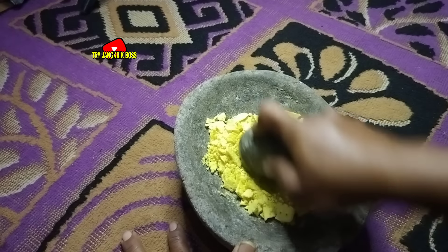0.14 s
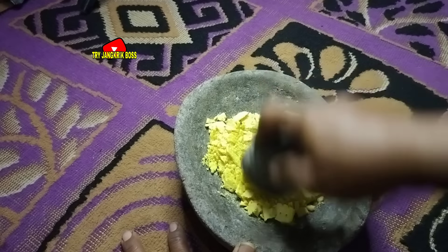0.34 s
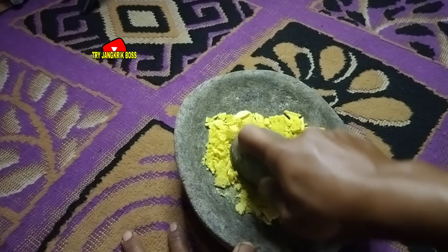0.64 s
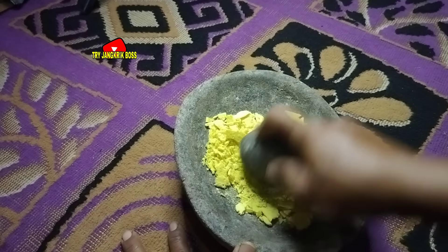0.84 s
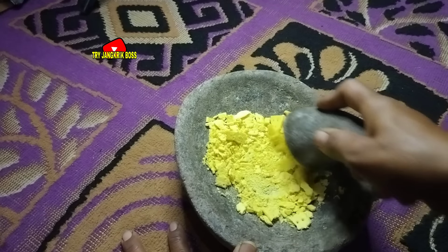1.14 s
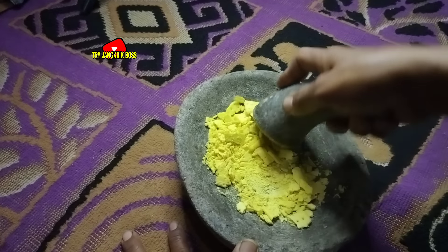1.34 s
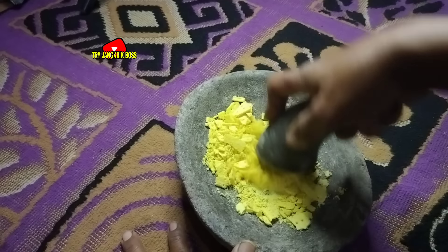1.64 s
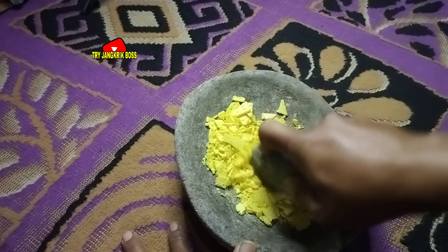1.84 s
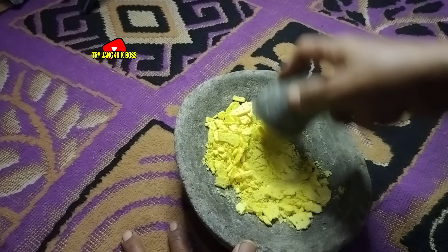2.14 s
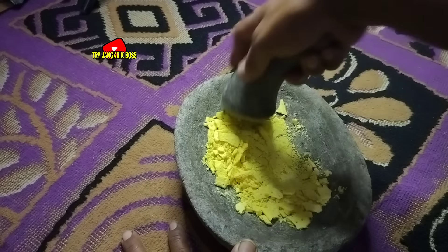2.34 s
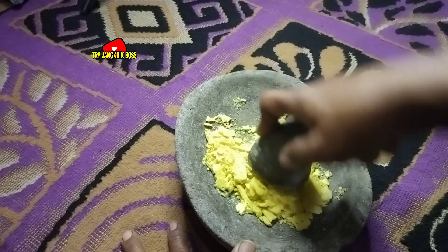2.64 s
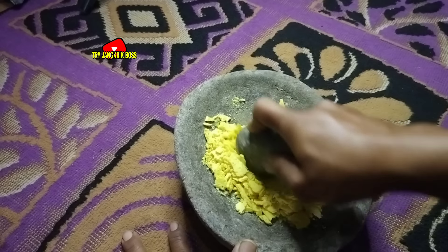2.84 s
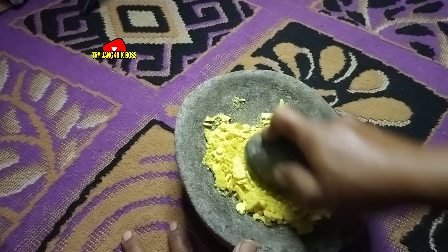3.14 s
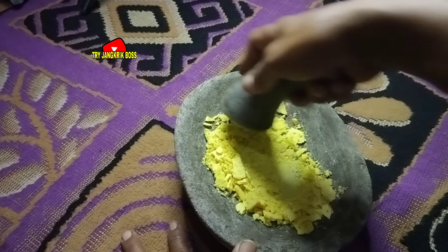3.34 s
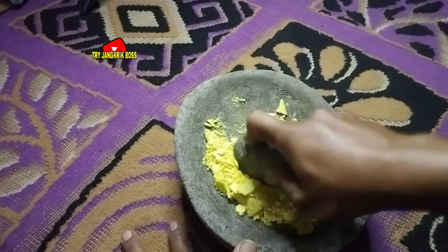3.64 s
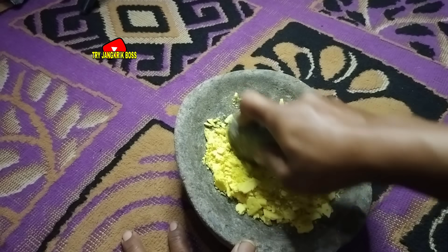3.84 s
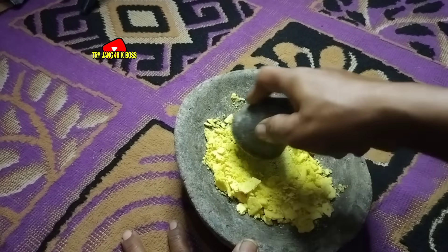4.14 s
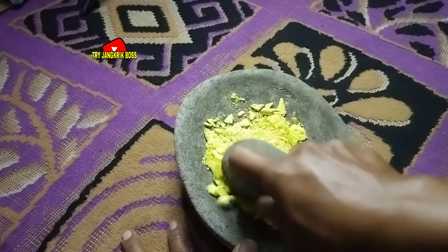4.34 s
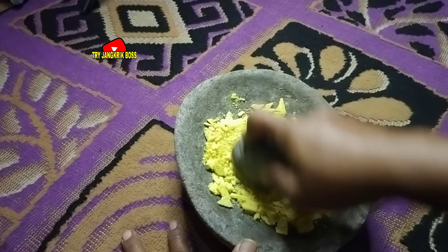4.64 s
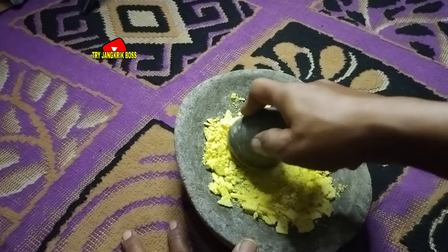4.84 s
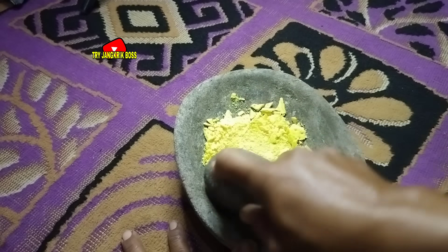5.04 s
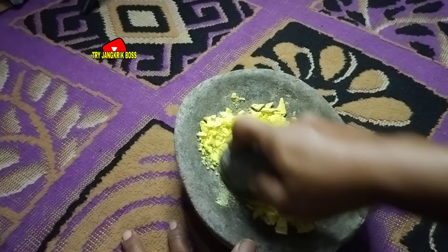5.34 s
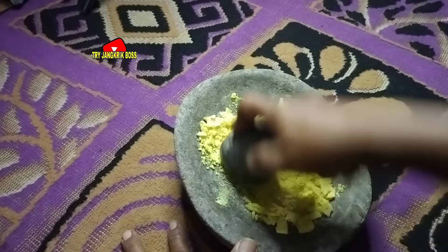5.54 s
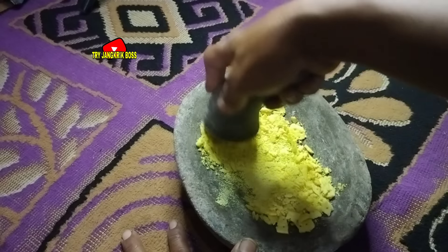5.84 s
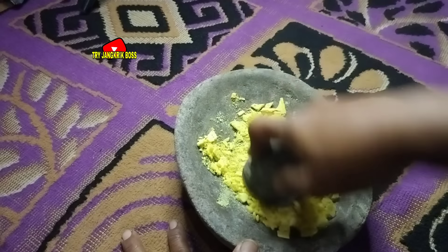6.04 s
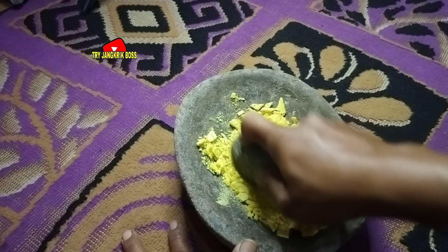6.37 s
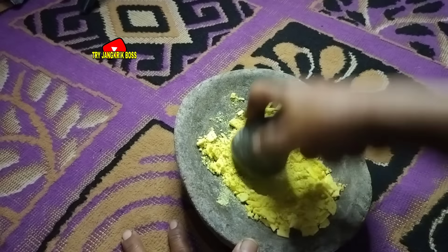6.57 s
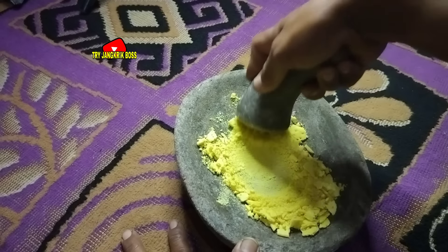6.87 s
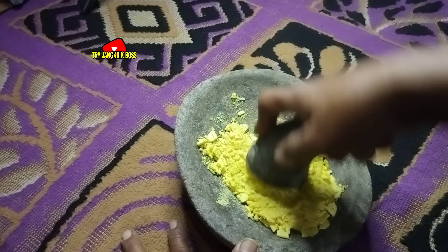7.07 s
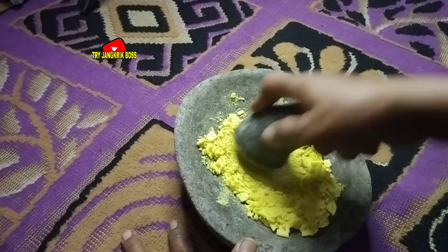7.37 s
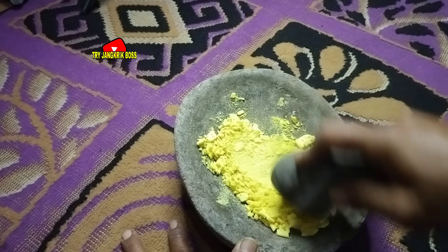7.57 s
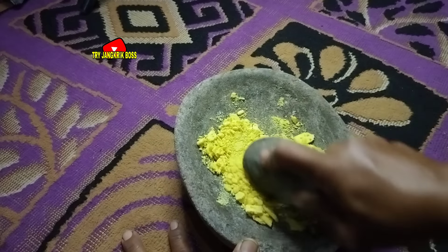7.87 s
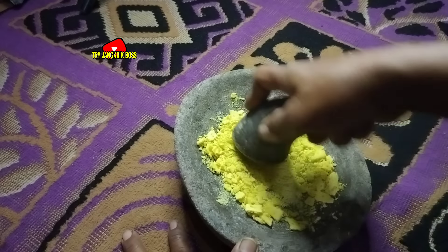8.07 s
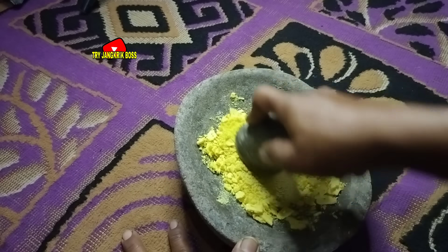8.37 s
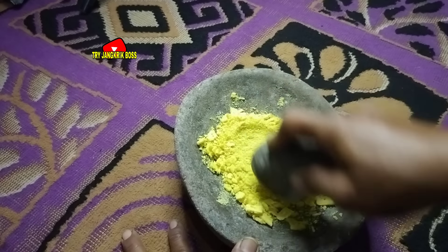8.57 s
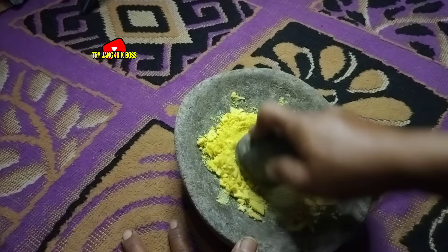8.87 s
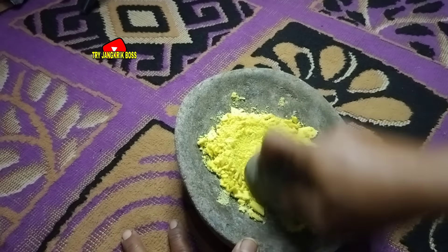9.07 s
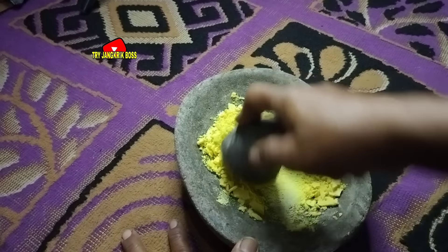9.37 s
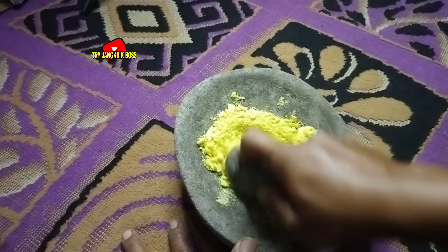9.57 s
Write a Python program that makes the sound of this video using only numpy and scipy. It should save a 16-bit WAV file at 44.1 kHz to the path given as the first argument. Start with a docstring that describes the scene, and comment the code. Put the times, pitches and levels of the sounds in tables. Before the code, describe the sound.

A stone pestle grinds dry crumbs in a stone mortar indoors, with gritty scraping strokes, small snaps, faint squeaks and a few ringing knocks.

```python
"""In a small room, on a carpet, a stone pestle grinds dry crumbs in a shallow stone mortar.
Each push crushes grains and rubs stone on stone, which keeps the pestle ringing faintly; bigger crumbs
snap and bare stone squeaks. The pestle lands softly on the crumbs, knocks hard on bare stone three
times and judders once. Low rumble and thin hiss lie underneath; puffs of air buffet the right microphone."""
import sys
import numpy as np
from scipy import signal
from scipy.fft import rfft, irfft, next_fast_len
from scipy.io import wavfile
from scipy.ndimage import uniform_filter1d

SR = 44100
rng = np.random.default_rng(int(sys.argv[2]) if len(sys.argv) > 2 else 0)


def generate_wav(sig):
    """Save sig (samples, or channels by samples) to the path in sys.argv[1] as 16-bit PCM at SR."""
    pcm = np.round(np.clip(np.atleast_2d(sig).T, -1, 1) * 32767).astype(np.int16)
    wavfile.write(sys.argv[1], SR, pcm)


N = 428211
TIME = np.arange(N) / SR
BIN_HZ = np.fft.rfftfreq(next_fast_len(N), 1 / SR)

# Levels are relative within a layer; a colour is a spectral density.
# colours of the room's low rumble and its peaky hiss: f/Hz, level/dB
RUMBLE_COLOUR = [(20, -2), (45, -5), (90, 6.5), (130, -0.5), (200, -5), (320, -17.5), (520, -20),
                 (1200, -73)]
HISS_COLOUR = [(700, 4), (3000, -4.5), (4200, -8.5), (5200, 5), (5950, -9), (7000, 13.5), (8600, -15.5),
               (10300, 11.5), (11200, 0.5), (12000, -27.5)]
# the background ducks, at the start and at the hard knocks: t/s, depth of the hiss dip/dB
BACKGROUND_DIPS = [(0, 6.5), (1.126, 9.5), (3.489, 9), (9.57, 9)]
# pushes of the pestle: t of peak/s, swell/s, fade/s, rub level/dB, crush level/dB, powder treble/dB; the last
# row stands for the stone ringing on after the final knock
PUSHES = [(0.069, 0.039, 0.03, -42.5, -30.5, -6.5), (0.229, 0.12, 0.063, -42.5, -39, -3),
          (0.561, 0.072, 0.039, -43, -29, 4), (0.631, 0.096, 0.048, -41.0, -32, -3),
          (0.761, 0.029, 0.031, -43, -36.5, -1), (0.828, 0.022, 0.17, -50.5, -43, -2.0),
          (1.287, 0.11, 0.097, -47.5, -37.0, 1.5), (1.384, 0.015, 0.0097, -54, -39.5, -4),
          (1.501, 0.052, 0.092, -67, -35, -3), (1.687, 0.086, 0.028, -43.5, -29, 1),
          (1.749, 0.057, 0.031, -56, -32.5, 2.5), (1.913, 0.19, 0.032, -61, -33, 2),
          (1.934, 0.054, 0.046, -40, -32, 1), (2.077, 0.022, 0.082, -55, -42.5, 0.5),
          (2.49, 0.03, 0.029, -42, -27.5, -2.5), (2.611, 0.11, 0.021, -62, -39.5, 11),
          (2.663, 0.13, 0.044, -42.0, -23, -3.5), (2.741, 0.023, 0.083, -49, -38, 1.5),
          (2.869, 0.098, 0.068, -38.5, -27, -6.5), (3.081, 0.051, 0.033, -38.5, -27.5, -2.0),
          (3.179, 0.046, 0.096, -40, -40, -3.5), (3.63, 0.071, 0.071, -48, -35.0, -2.5),
          (3.782, 0.064, 0.047, -41, -35, -1), (3.939, 0.038, 0.061, -47.5, -39, 0.5),
          (4.038, 0.023, 0.15, -44.5, -49, -8), (4.387, 0.024, 0.12, -40.5, -28.5, -1),
          (4.542, 0.088, 0.022, -42.5, -32.5, -7), (4.702, 0.049, 0.033, -45, -30.5, -10.0),
          (4.799, 0.033, 0.076, -41.5, -33, -4), (5.243, 0.079, 0.064, -38.5, -32, 5.5),
          (5.425, 0.039, 0.036, -37.5, -26, 1), (5.562, 0.092, 0.087, -41.5, -37.5, -2),
          (6.01, 0.075, 0.073, -38, -28.5, -1), (6.07, 0.026, 0.12, -40.5, -25.5, -4.0),
          (6.241, 0.045, 0.055, -38.5, -26, -2), (6.279, 0.049, 0.066, -34.5, -30.5, -2.5),
          (6.485, 0.042, 0.035, -39.0, -36, 0.0), (6.591, 0.039, 0.066, -40, -44, -0.5),
          (7.037, 0.062, 0.026, -38, -28.5, -1), (7.115, 0.081, 0.073, -39.5, -28, -4.5),
          (7.258, 0.035, 0.073, -31.5, -23, -6), (7.874, 0.086, 0.065, -38.5, -27, 7.5),
          (8.052, 0.18, 0.048, -35.5, -25, -4), (8.258, 0.048, 0.048, -35.5, -23, -0.5),
          (8.397, 0.049, 0.064, -31.5, -26, -2), (8.842, 0.04, 0.105, -35, -33.0, 10.5),
          (8.946, 0.14, 0.053, -35, -25.5, -5), (9.142, 0.05, 0.043, -39, -27, 2.5),
          (9.3, 0.063, 0.054, -35, -27.5, -1.5), (9.657, 0.097, 0.21, -38, -45, 3)]
# colours of stone rubbing stone and of breaking crumbs: f/Hz, level/dB
RUB_COLOUR = [(300, -32), (480, -1), (750, -10), (1000, 0), (1250, 5), (1550, 3), (1850, -14),
              (2400, -10.5), (3200, -35), (5000, -2.5), (9000, -17.5)]
CRUSH_COLOUR = [(700, -22.5), (1500, -9.5), (2500, 1.5), (3200, -2.5), (4400, 3.5), (5900, -2), (6900, 2.5),
                (8200, -5), (10500, -3.5), (12500, -12), (15500, -13.5)]
# fractures are sparse in big flakes, dense in powder: t/s, rate/Hz
FRACTURE_RATE = [(.9, 30000), (1.3, 4100), (1.6, 3600), (1.95, 22000), (8, 26600)]
# the treble shelf that fine powder lifts: f/Hz, gain
POWDER_SHELF = [(4500, 0.14), (9000, 0.98)]
# stereo image of the grinding: f/Hz, left-right correlation
STEREO_LIKENESS = [(450, 0.89), (1200, 0.66), (4000, 0.33), (11000, 0.0)]
# ringing modes of the stone: f/Hz, level/dB, t60/s, left-ear lead/rad (limited to +-1 in use)
STONE_MODES = [(2130, -8.5, 0.35, -6), (2127, -12.5, 0.16, -3.5), (2225, 2, 0.11, 3),
               (2224, -16, 0.41, 4.4), (4630, -21, 0.105, -3.5), (6800, -14.5, 0.071, 0)]
# puffs of air: t of peak/s, level/dB, fade/s
AIR_PUFFS = [(.1, -22, 0.055), (0.149, -8, 0.045), (0.547, -6.5, 0.037), (.63, -21, 0.11),
             (0.831, -5, 0.052), (.91, -12, 0.069), (1.0, -13.5, 0.041), (1.112, -12.5, 0.052),
             (1.19, -23, .07), (3.55, -25, 0.049), (4.052, -14.5, 0.053), (4.1, -15, .03),
             (4.17, -24.5, 0.066), (4.408, -14.5, 0.044), (4.48, -10.5, 0.038), (8.77, -18.5, 0.066),
             (8.969, -13.5, 0.011)]
# their bassy colour: f/Hz, level/dB
PUFF_COLOUR = [(18, -4.5), (70, 2), (130, 0), (190, -9.5), (400, -34.5), (700, -67)]
# a stroke ends on bare stone and squeaks: t/s, level/dB
STONE_SQUEAKS = [(.17, -46), (.8, -43), (1.95, -40), (3.2, -43), (3.76, -42), (4.04, -50), (4.812, -37),
                 (6.278, -30.5), (6.49, -45), (6.6, -39), (7.308, -29), (8.41, -31.5), (8.95, -32.5),
                 (9.32, -30.5)]
# crumbs bursting under the pestle: t/s, level/dB, crumbling time/s
CRUMB_SNAPS = [(0.4538, -17.5, 0.016), (1.222, -19.5, 0.0028), (1.383, -21, 0.0014), (1.419, -23, 0.0016),
               (1.46, -18.5, .001), (1.4673, -11.5, 0.00068), (1.7695, -12, 0.0022), (1.8157, -18, 0.0021),
               (2.072, -31, 0.0023), (2.4116, -20.5, 0.0064), (4.366, -22, 0.0062), (5.1127, -23.5, 0.0076),
               (5.385, -27, .01), (5.884, -18, 0.0078), (6.8647, -23, 0.015), (7.676, -23.5, 0.018),
               (7.789, -20, 0.0028), (8.196, -27.5, 0.011), (8.75, -16, 0.0053), (9.082, -24.5, 0.012),
               (9.563, -20, 0.008)]
# pestle meets mortar: t/s, ring level/dB, clack level/dB, ring length factor, lowest pair's boost/dB
PESTLE_KNOCKS = [(.457, -39, -36, 2, -7), (1.1222, -5.5, -5, 1.35, -4), (1.228, -32.5, -15, 0.8, 15.5),
                 (2.411, -28.5, -20.5, 0.9, -13), (3.4887, -11, 2.5, 0.59, -3.5),
                 (3.9244, -38.5, -58, 2.0, -7), (5.1124, -42.5, -38, 2.5, 9), (5.8854, -34, -26, 1.3, 11),
                 (6.9922, -44, -16.5, 0.5, -9), (7.6789, -25.5, -53, 1.5, -11),
                 (7.6877, -18.5, -59, 1, -26), (8.752, -22.5, -49, 0.94, -15),
                 (9.5682, -14.5, -1.5, 0.49, 14.5), (9.629, -25.5, -60, 1, 17.5)]
# short, hand-damped modes of a contact: f/Hz, level/dB, t60/s
CLACK_MODES = [(1227, -2, 0.016), (1520, 1, 0.0097)]
# envelope of the pestle juddering over bare stone: t/s, level/dB
JUDDER_ENVELOPE = [(6.885, -36), (6.888, -26.5), (6.903, -22.5), (6.927, -19.5), (6.94, -28), (6.965, -63)]
# its rasping colour: f/Hz, level/dB
JUDDER_COLOUR = [(220, -26), (450, -3), (700, -11), (1150, 6), (1600, -5), (2400, 5.5), (3200, -14),
                 (4500, -8.5), (6000, -25), (10000, -47)]


def from_db(db):
    """Decibels to gain."""
    return 10 ** (np.asarray(db) / 20)


def rms_one(x):
    """Scale to unit power."""
    return x / np.sqrt(np.mean(x ** 2) + 1e-20)


def in_time(points):
    """A curve over time, joined by straight lines."""
    return np.interp(TIME, *np.transpose(points))


def per_bin(points):
    """A curve over log frequency, read at every FFT bin."""
    hz, value = np.transpose(points)
    return np.interp(np.log(BIN_HZ + 1), np.log(hz), value)


def shaped(x, gain):
    """Equalise with one gain per FFT bin."""
    return irfft(rfft(x, next_fast_len(N)) * gain, next_fast_len(N))[..., :N]


def coloured(x, colour):
    """Give a signal a colour, at unit power."""
    return rms_one(shaped(x, from_db(per_bin(colour))))


def spread(pair):
    """Two unrelated signals become mid and side: narrow in the bass, wide in the treble."""
    alike = per_bin(STEREO_LIKENESS)
    return shaped(pair[0], np.sqrt(1 + alike)) + shaped(pair[1], np.sqrt(1 - alike)) * [[1], [-1]]


def drift(rate_hz, size=8192):
    """A smooth random modulator at unit power."""
    hz = np.fft.rfftfreq(size, N / SR / size)
    slow = irfft(rfft(rng.standard_normal(size)) / (1 + (hz / rate_hz) ** 2))
    return np.interp(np.linspace(0, size - 1, N), np.arange(size), rms_one(slow))


def hump(peak_s, swell_s, fade_s, flatness):
    """A rounded envelope of height 1, 10 dB down at swell_s before its peak and fade_s after it."""
    envelope = np.zeros(N)
    near = slice(*np.searchsorted(TIME, [peak_s - 6 * swell_s, peak_s + 6 * fade_s]))
    t = TIME[near] - peak_s
    envelope[near] = from_db(-10 * np.maximum(-t / swell_s, t / fade_s) ** flatness)
    return envelope


def ring(force, hz, t60, phase=0):
    """One resonator: a unit click starts a dying sine of height 1."""
    r, w = from_db(-60 / (t60 * SR)), 2 * np.pi * hz / SR
    feedback = [1, -2 * r * np.cos(w), r * r]
    return signal.lfilter([np.sin(phase), r * np.sin(w - phase)], feedback, force + 1e-18)


def background(recovery_s=1.87):
    """A bed of room rumble and thin hiss; both duck suddenly and creep back."""
    dip_db = sum(depth_db * (TIME >= s) * np.exp(-np.abs(TIME - s) / recovery_s)
                 for s, depth_db in BACKGROUND_DIPS)
    rumble = coloured(rng.standard_normal(N) + 0.23 * rng.standard_normal((2, N)), RUMBLE_COLOUR)
    hiss = coloured(.5 * rng.standard_normal(N) + rng.standard_normal((2, N)), HISS_COLOUR)
    return from_db(-34.5 - 0.92 * dip_db) * rumble + from_db(-44.5 - dip_db) * hiss


def pushes(rub_lag_s=0.0022):
    """Overlapping pushes add in power, giving the gains of the rub, the crush and the powder's treble."""
    rub, crush, treble = np.full((3, N), 1e-12)
    for s, swell_s, fade_s, rub_db, crush_db, powder_db in PUSHES:
        power = hump(s, swell_s, fade_s, flatness=1.75) ** 2
        rub += power * from_db(rub_db) ** 2
        crush += power * from_db(crush_db) ** 2
        treble += power * from_db(crush_db + powder_db) ** 2
    late_rub = np.interp(TIME - rub_lag_s, TIME, np.sqrt(rub))  # stones meet after the crumbs give way
    return late_rub, np.sqrt(crush), np.sqrt(treble / crush)


def grains(per_s, size_db, clump_db, clump_hz):
    """Tiny fractures of uneven size that come in clumps; two unrelated channels at unit power."""
    born = rng.random(N) < per_s / SR
    size = from_db(size_db * np.minimum(rng.exponential(1, N), 4) + clump_db * drift(clump_hz))
    return rms_one(born * size * rng.standard_normal((2, N)) / np.sqrt(per_s + 1))


def stone(force, length, low_db):
    """The stone's modes, phased between the ears; the point of contact weights the lowest pair."""
    ringing = 0
    for k, (hz, db, t60, lead) in enumerate(STONE_MODES):
        phase = np.clip(lead, -1, 1) / 2
        mode = np.array([ring(force, hz, t60 * length, side * phase) for side in (1, -1)])
        ringing += from_db(db + low_db * (k < 2)) * mode
    return ringing


def hand_echo(x, delay_s, swing, strength):
    """The moving hand throws the sound back with a wandering delay: a gentle flange."""
    lag_s = delay_s * np.exp(swing * drift(5.0))
    echo = np.array([np.interp(TIME - lag_s, TIME, side) for side in x])
    return (x + strength * echo) / np.hypot(1, strength)


def grinding():
    """Grit rubs stone on stone and keeps the pestle singing, while crumbs crunch above it."""
    rub_gain, crush_gain, fineness = pushes()
    grit = grains(per_s=12000, size_db=2.5, clump_db=1.76, clump_hz=30)
    rub = rub_gain * from_db(-3.4) * coloured(spread(grit), RUB_COLOUR)
    fractures = grains(in_time(FRACTURE_RATE), size_db=2.0, clump_db=2.45, clump_hz=14)
    crush = crush_gain * from_db(-0.5) * coloured(spread(fractures), CRUSH_COLOUR)
    crush += (fineness - 1) * shaped(crush, per_bin(POWDER_SHELF))  # powder hisses higher than flakes
    # the stones touch on and off, more directly through fine powder
    force = rub_gain * fineness ** 0.64 * from_db(2 * drift(7.5)) * grit[0]
    singing = from_db(-21) * stone(force, length=0.73, low_db=-10)
    return hand_echo(rub + crush, delay_s=0.000696, swing=0.284, strength=0.28) + singing


def air_puffs():
    """Lumpy moving air buffets the right microphone and barely touches the left."""
    power = sum((from_db(db) * hump(s, swell_s=0.022, fade_s=fade_s, flatness=1.43)) ** 2
                for s, db, fade_s in AIR_PUFFS)
    turbulence = rng.standard_normal((2, N)) * from_db(2 * drift(38))
    return np.sqrt(power) * from_db([[-28], [0]]) * coloured(turbulence, PUFF_COLOUR)


def squeaks(hz, t60, half_width_s):
    """Friction briefly feeds one high mode of the stone and holds it at an even strength."""
    pressure = sum(from_db(db) * np.exp(-np.minimum(((TIME - s) / half_width_s) ** 2, 50))
                   for s, db in STONE_SQUEAKS)
    tone = np.array([ring(rng.standard_normal(N), hz, t60) for side in range(2)])
    running_rms = np.sqrt(uniform_filter1d(tone ** 2, size=900, axis=1) + 1e-9)
    return pressure * tone / running_rms


def snaps():
    """A larger crumb bursts into a quickly dying shower of fractures."""
    envelope = np.zeros(N)
    for s, db, crumbling_s in CRUMB_SNAPS:
        at = round(s * SR)
        envelope[at:] += from_db(db - 5.5) * np.exp(-np.minimum(TIME[:N - at] / crumbling_s, 50))
    return envelope * coloured(spread(rng.standard_normal((2, N))), CRUSH_COLOUR)


def knocks():
    """Each contact gives a short clack and sets the stone ringing; a firm grip shortens the ring."""
    size = SR // 2
    track, blow = np.zeros((2, N + size)), signal.unit_impulse(size)
    # powder rounds the blow, and small stones radiate little bass
    cushion = signal.butter(2, [1000, 2800], "band", fs=SR, output="sos")
    clack = sum(from_db(db) * ring(blow, hz, t60) for hz, db, t60 in CLACK_MODES)
    for s, ring_db, clack_db, length, low_db in PESTLE_KNOCKS:
        hit = from_db(ring_db) * stone(blow, length, low_db) + from_db(clack_db - 5.5) * clack
        at = round(s * SR)
        track[:, at:at + size] += signal.sosfilt(cushion, hit)
    return track[:, :N]


def judder():
    """The pestle sticks and slips in a dense rattle, rasping and feeding the ring."""
    sliding = (TIME > JUDDER_ENVELOPE[0][0]) & (TIME < JUDDER_ENVELOPE[-1][0])
    envelope = from_db(in_time(JUDDER_ENVELOPE)) * sliding
    slips = envelope * grains(per_s=4500, size_db=-0.5, clump_db=1.0, clump_hz=160)
    rasp = shaped(spread(slips), rms_one(from_db(per_bin(JUDDER_COLOUR))))
    return rasp + from_db(-22.5) * stone(slips[0], length=0.2, low_db=-27)


def room(send, t60, gap_s, damping_hz):
    """Dense reflections start after a short gap and die away, dulled by the furnishings."""
    t = TIME[:SR * 3 // 4]
    tail = rng.standard_normal((2, len(t))) * from_db(-60 * t / t60) * (t > gap_s)
    tail /= np.sqrt(np.sum(tail[0] ** 2))
    tail = signal.sosfilt(signal.butter(2, damping_hz, fs=SR, output="sos"), tail)
    return signal.fftconvolve(send, tail, axes=1)[:, :N]


def scene():
    """The mix: the mortar up close, its room, and the air."""
    scraping = grinding() + snaps() + squeaks(hz=4040, t60=0.12, half_width_s=0.041)
    scraping *= from_db([[.5], [-.5]])  # a touch to the left
    blows = knocks() + judder()
    send = from_db(-12.5) * scraping + from_db(-9.5) * blows
    reflections = room(send, t60=0.41, gap_s=0.006, damping_hz=4300)
    return scraping + blows + reflections + background() + air_puffs()


def record(dry, cutoff_hz=15800):
    """A soft clip flattens the hardest peaks and a steep low-pass takes off the top."""
    clipped = dry / (1 + dry ** 16) ** (1 / 16)
    return signal.sosfilt(signal.ellip(10, .1, 90, cutoff_hz, fs=SR, output="sos"), clipped)


dry = scene()
out = record(dry)
generate_wav(out)
```